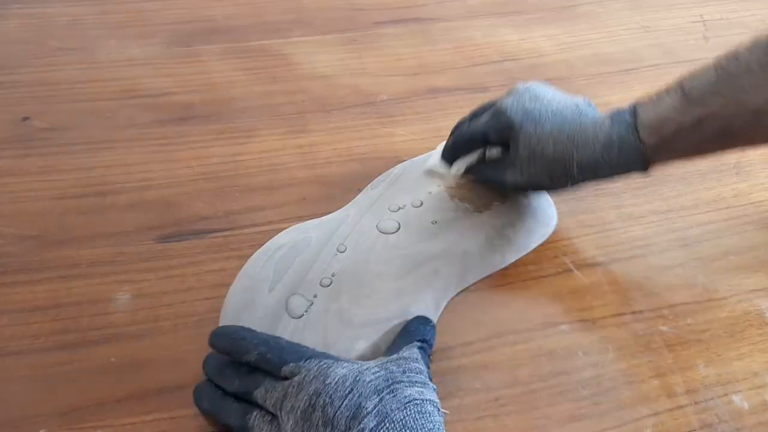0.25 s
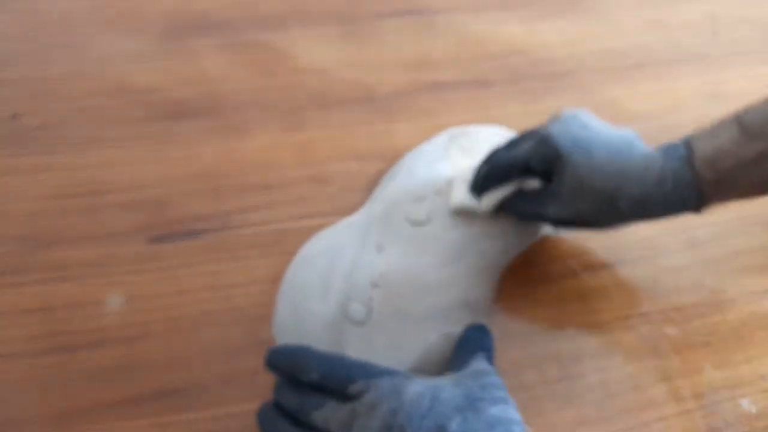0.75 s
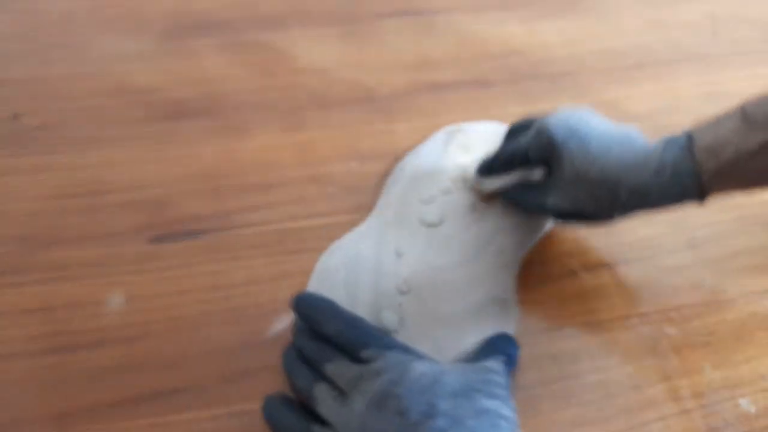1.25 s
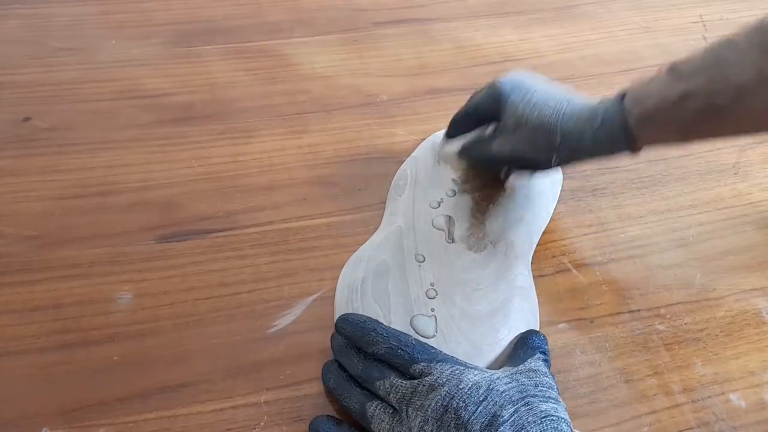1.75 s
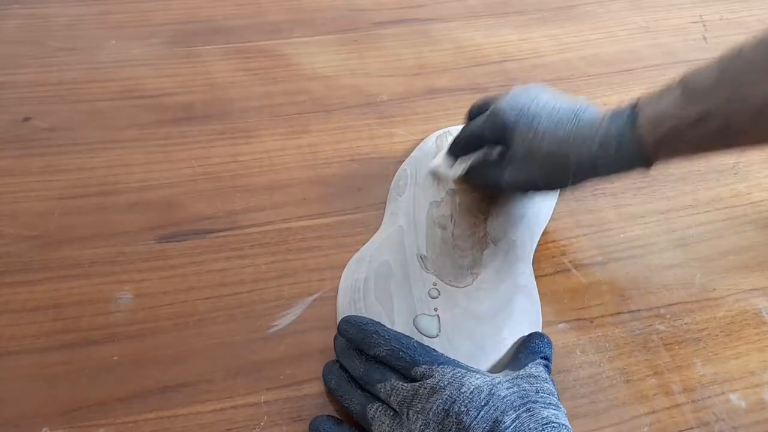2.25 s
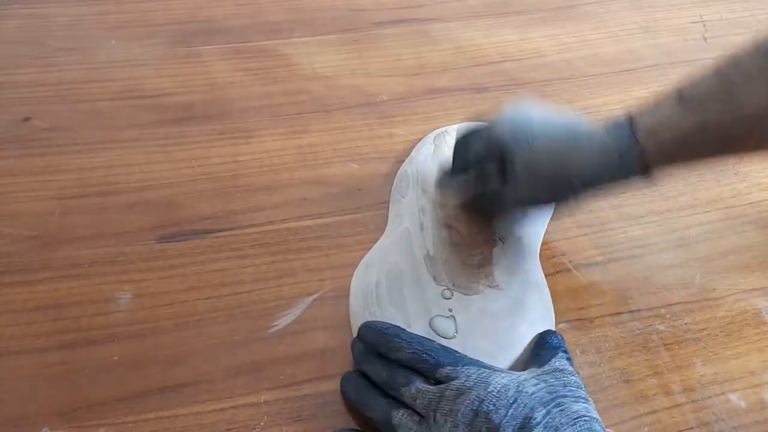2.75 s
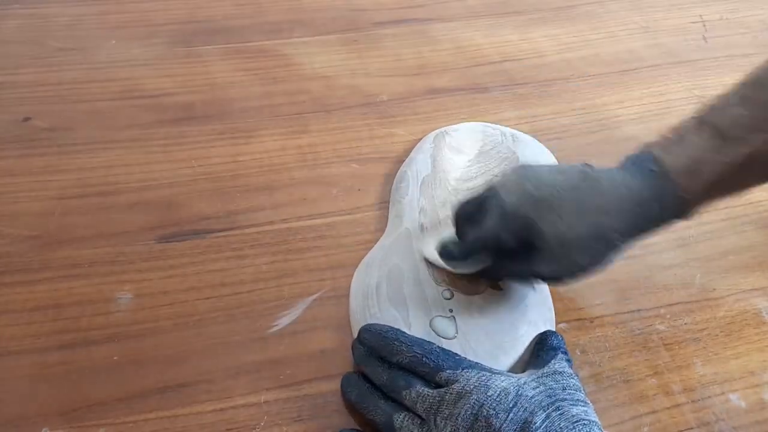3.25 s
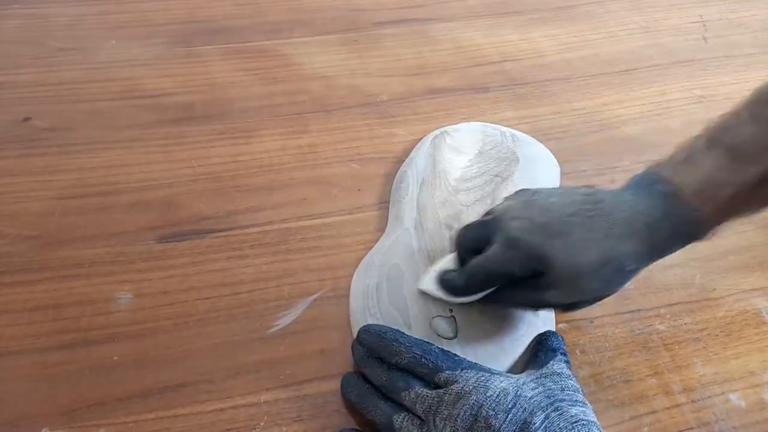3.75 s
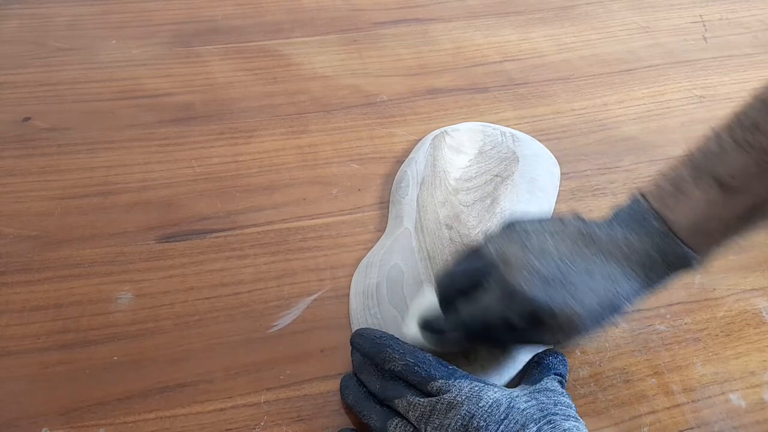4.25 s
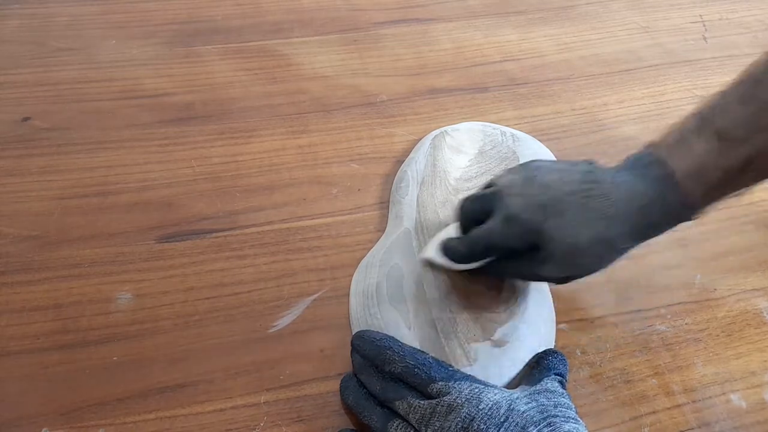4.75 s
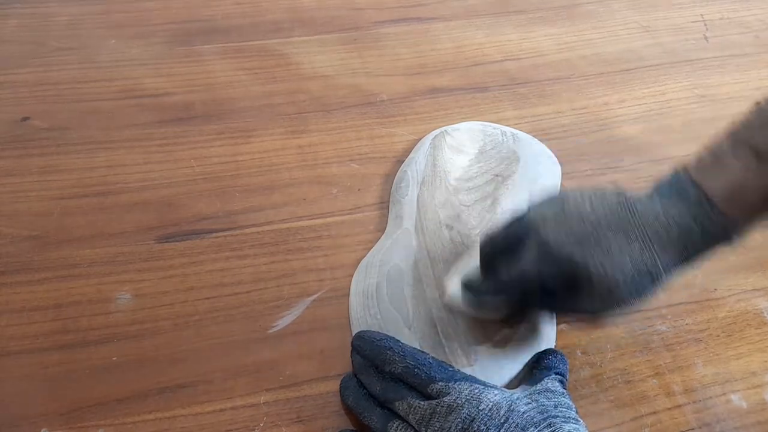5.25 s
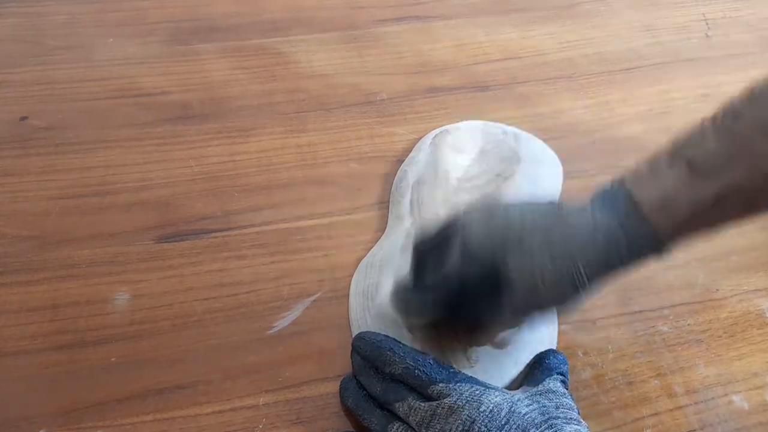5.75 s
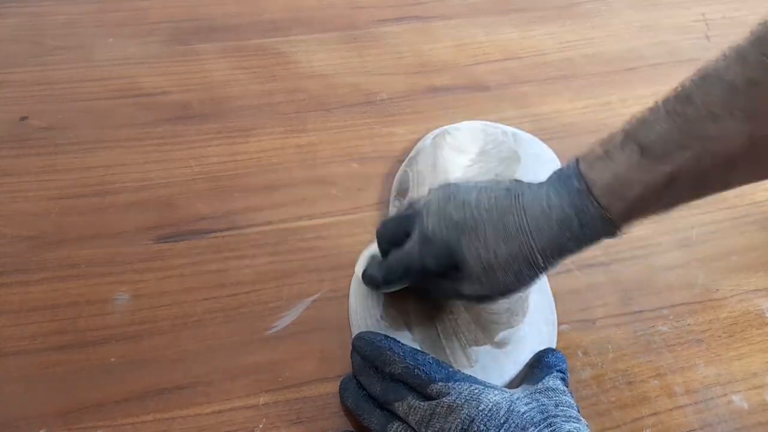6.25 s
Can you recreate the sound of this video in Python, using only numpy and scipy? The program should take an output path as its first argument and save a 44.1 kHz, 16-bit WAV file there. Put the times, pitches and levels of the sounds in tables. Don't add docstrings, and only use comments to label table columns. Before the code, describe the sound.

Quiet, dry cloth strokes on a wooden block, with occasional drags and tiny taps against a table, under a steady deep rumble of distant traffic.

```python
import sys
import numpy as np
from scipy import signal
from scipy.fft import rfft, irfft, next_fast_len
from scipy.io import wavfile
from scipy.ndimage import uniform_filter1d, map_coordinates

SR = 44100
rng = np.random.default_rng(int(sys.argv[2]) if len(sys.argv) > 2 else 0)


def store_pcm(level_fs):
    pcm = np.round(np.clip(level_fs, -1, 1) * 32767).astype(np.int16)
    wavfile.write(sys.argv[1], SR, np.atleast_2d(pcm).T)


def field_ratio(decibels):
    return 10 ** (np.asarray(decibels, dtype=float) / 20)


N = 287091
TIME = np.arange(N) / SR
STEPS = TIME[::16]

# start in seconds, length in seconds, level in dB, share (0-1) where it is fastest.
STROKES = [(0.018, 0.27, -71, 0.44), (0.225, 0.25, -72.5, .7), (0.432, 0.57, -67.5, 0.04),
           (0.84, 0.23, -67.5, 0.6), (0.913, 0.1, -63.5, 0.3), (1.067, 0.56, -66.5, 0.11),
           (1.195, 0.24, -61.5, 0.7), (1.735, .24, -70, 0.48), (2.087, 0.16, -72.5, 0.2),
           (2.275, 0.2, -67, 0.52), (2.45, 0.28, -68, .6), (2.637, 0.28, -65, 0.72),
           (2.878, 0.24, -66.5, 0.58), (3.108, 0.2, -61.5, 0.71), (3.299, 0.22, -63, 0.19),
           (3.5, 0.28, -62.5, 0.66), (3.753, 0.21, -68.5, 0.52), (3.951, 0.31, -65, 0.4),
           (4.238, 0.16, -70.5, .35), (4.44, 0.21, -71, 0.73), (4.584, 0.23, -70.5, 0.55),
           (4.76, 0.25, -67.5, 0.56), (4.93, 0.33, -68.5, 0.45), (5.143, 0.27, -65, 0.48),
           (5.342, 0.28, -63, 0.68), (5.6, 0.24, -62, 0.6), (5.816, .25, -62, 0.72),
           (6.07, .227, -57.5, 0.67), (6.299, 0.24, -60.5, 0.42)]
# time in seconds, scrub over hiss in dB.
DRYNESS = [(0, -3.5), (.5, 0), (.8, -4.5), (.96, -7.5), (1.15, -0.5), (1.9, -2.5), (2.6, -1.5), (3.0, -2),
           (3.25, -3.5), (3.65, -3.5), (4.2, -2.5), (4.3, -7.5), (4.55, -2), (4.67, -6.5), (5.15, -3.5),
           (5.3, -6), (5.9, -5), (6.5, -5.5)]
# frequency in Hz, level in dB per Hz.
FIBRES = [(6000, -120), (7600, -19), (8230, -9.5), (11100, -2.5), (11800, 0.6), (13000, -0.5), (15700, -3),
          (16100, -13.5)]
# frequency in Hz, level in dB per Hz.
WEAVE = [(4500, -120), (5600, -14), (6300, -4.5), (6700, -3.5), (7000, -4.8), (7400, -5.5), (8000, -16),
         (9500, -34), (12000, -120)]
# frequency in Hz, level in dB per Hz.
GRAIN = [(1200, -120), (2000, -8), (2900, -7), (4200, -6.5), (4800, -3), (5300, -3.5), (5800, -2.5),
         (6300, -17.5), (8000, -120)]
# frequency in Hz, width in Hz, level in dB.
HEM_MODE = [(7010, 260, 0)]
STROKE_ROUND, SLIDE_ROUND = 0.8, 0.51
GRAIN_FOLLOWS, GRAIN_DB = 1, 3

# start in seconds, length in seconds, rasp level in dB,
# low rings over the rasp in dB, high ring over the rasp in dB.
SLIDES = [(0.38, .17, -70.5, 5.5, -2), (0.5, 0.22, -71.5, 6, -4), (0.682, .15, -70, 1, -3),
          (0.9, .18, -72.5, -1, -0.5), (1.078, .07, -73, -1, -3), (1.168, 0.13, -62.5, -1.5, 2),
          (1.228, 0.22, -62, -7, 0.5), (1.293, .13, -61, -1, -6), (1.388, .13, -67.5, 0, -12),
          (1.76, 0.25, -75.5, 3, -8), (2.575, .11, -67, -5, -10), (2.635, 0.089, -63, -4.5, -14),
          (2.728, 0.19, -74, -4, -4), (3.18, 0.17, -73.5, -15, -8), (4.12, 0.072, -69.5, -10, -13),
          (6.134, .15, -73, -6, -13), (6.295, 0.17, -80, 0, -6)]
# frequency in Hz, width in Hz, level in dB.
BLOCK_MODES = [(1140, 72, -1), (1846, 26, 2), (2400, 240, -7), (2630, 150, -7.5), (3330, 42, -9),
               (3580, 50, -5.5), (3840, 60, -15)]
# frequency in Hz, width in Hz, level in dB.
RINGS = [(1540, 240, 0), (1690, 27, 0), (2580, 65, 0)]
# frequency in Hz, level in dB per Hz.
DRAG = [(150, -120), (210, 17), (500, 1), (1200, -9), (2000, -2.5), (4000, -9), (7000, -50), (8000, -120)]
# frequency in Hz, level in dB per Hz.
TABLE_TOP = [(150, -120), (190, -2), (450, -2), (1100, -12.5), (1600, -120)]
SLIDE_FASTEST, RING_SWING_DB = 0.57, 2.5
LIGHT_DB = -71
MIDDLE_RING_DB, MIDDLE_WAKES = -9, 0.78
GROAN_DB, GROAN_WAKES = -2.5, 0.52

# time in seconds, snap peak in dB, then body, knock and edge over the snap in dB.
TICKS = [(0.1013, -49, -0.5, -8, -10), (0.3317, -46, -27, -18, -22), (0.3909, -49, -2, -11, -3),
         (0.4244, -47, -3, -15, -8), (0.46, -53, 6, -14, 1), (0.8107, -53.5, -19, -1, 0),
         (0.845, -54, -18, -14, -14), (1.0484, -50.5, -16, -5, -10), (1.4819, -44.5, -13, -18, -6),
         (2.174, -42.5, -5, -13, -4), (2.5398, -43, -11, -20, 2), (2.5646, -50, 1, -6, 0.5),
         (2.5667, -52, 8, 7, -4), (4.0012, -59, -7, -6, -10), (4.1256, -38.5, -0.5, -4, -4)]
# frequency in Hz, time to fall 60 dB in seconds.
TAIL = [(800, 0.24), (3000, 0.31), (7000, 0.083), (12000, 0.077)]

# time in seconds, level in dB.
TRAFFIC = [(0, -57.5), (.5, -54), (1.05, -55), (1.41, -53), (1.55, -56), (1.98, -55), (2.14, -56),
           (2.8, -56.5), (3.2, -58), (3.43, -59.5), (3.72, -56.5), (3.86, -58), (4.0, -56), (4.15, -57.5),
           (4.9, -55), (5.25, -54.5), (6.0, -54), (6.51, -55.5)]
# centre in seconds, length in seconds, lift of the deep hum in dB, lift
# of the upper hum in dB.
SURGES = [(0, 0.13, 3.5, 7), (.13, .08, -2, -6), (.39, .08, -2, -3), (0.473, .06, 3.5, 11.5),
          (.6, 0.19, 4.5, 7), (.72, 0.13, -1, 4), (0.926, 0.18, 5.5, 1.5), (1.25, .3, -0.5, 0.5),
          (1.522, 0.085, -10, -3), (1.612, .15, 8, -3), (1.804, 0.18, -3, -9), (1.965, .12, 8, 0.5),
          (2.058, .06, -12, -1), (2.645, 0.21, -1, 3.5), (3.057, 0.17, 6, -2), (3.33, 0.11, 11.5, -3),
          (3.43, 0.14, -11, -6), (3.532, 0.12, 7.5, -2.5), (3.854, 0.13, -2, -1), (3.994, 0.18, 0.5, 4.5),
          (4.618, 0.088, 4.5, 2), (5.16, 0.15, 3.5, 7), (5.35, .1, -3, 4.5), (5.55, .12, 3, 3.5),
          (5.72, .12, 7, 2.5), (5.825, 0.093, -8, 6), (6.02, 0.15, 2, 0), (6.16, 0.22, -1.5, -5.5),
          (6.363, 0.28, 0.5, 5)]
# frequency in Hz, width in Hz, level in dB.
DEEP_MODES = [(30.2, 7.7, -19), (50.4, 9.2, -8), (60.75, 8.1, -2)]
# frequency in Hz, width in Hz, level in dB.
STEADY_MODE = [(104.7, 6.5, 0)]
# frequency in Hz, width in Hz, level in dB.
HUM_MODES = [(128.6, 23, -7.5), (142.3, 12.7, 2), (162.2, 15, -8), (171.5, 16, -11)]
# frequency in Hz, width in Hz, level over the drone in dB.
DRONE_MODES = [(232.4, 13.7, 8), (284, 5, 3), (322.5, 7.1, 6), (348, 14, 1.5), (513, 21, -0.5)]
# frequency in Hz, level in dB per Hz.
DRONE = [(20, -44), (80, -16), (200, -5), (330, -4.5), (520, -8), (700, -11), (1400, -18), (2300, -25),
         (3200, -39), (5000, -120)]
# frequency in Hz, level in dB per Hz.
TYRES = [(500, -36), (750, -8.5), (930, 1.5), (1050, -2), (1300, -8.5), (1450, -13), (2200, -14),
         (3000, -120)]
# frequency in Hz, left-right likeness (0-1).
FAR_ALIKE = [(40, 0.96), (62, 0.9), (130, 0.94), (290, 0.9), (640, 0.28), (1410, 0.011)]
DEEP_DB, UPPER_DB, TYRE_DB = 6.5, 2.5, -11.5
TYRES_FOLLOW = 0.22

# frequency in Hz, left minus right in dB.
FAR_PAN = [(50, -1.5), (130, -0.5), (290, -4), (640, -3), (1410, 0.5), (3100, -2.5), (6820, -4),
           (15000, -1)]
# frequency in Hz, lead in radians.
LEAD = [(520, -2.5), (1460, 0.5), (2670, 1.3), (6800, 1.5), (8000, 1.7), (11000, 2), (13200, 4.5),
        (15500, 12.5)]
# frequency in Hz, level in dB per Hz.
SELF_NOISE = [(1300, -18), (2200, -26), (3000, -13), (4000, -13), (5500, -8), (6900, -8.5), (8100, -18),
              (12000, -11.5), (15700, -11.5), (16100, -10)]
TOP_HZ = 15810


def cloth():
    start, length, db, fastest = np.transpose(STROKES)
    dry_db, = curves(DRYNESS)
    speed = together(db, moves(start, length, fastest, STROKE_ROUND))
    speed = speed * field_ratio(1.06 * wobble(30))
    hiss = field_ratio(3.0) * ports(shape(FIBRES), [(9000, 0.08)], grain_db=1.0)
    scrub = field_ratio(dry_db + 1.5) * ports(shape(WEAVE), [(6500, 0.57)], grain_db=1.5)
    rasp = field_ratio(GRAIN_FOLLOWS * dry_db + GRAIN_DB) * ports(shape(GRAIN), [(4000, 0.97)], grain_db=1.0)
    hem = field_ratio(-10.5 + 3.3 * wobble(5.14)) * ports(sharp(HEM_MODE, 1.6), [(7000, 0.3)])
    return patched(speed * (hiss + scrub + rasp + hem), depth_db=1.37, size=(8, 20))


def slides():
    start, length, db, low_db, high_db = np.transpose(SLIDES)
    speeds = moves(start, length, SLIDE_FASTEST, SLIDE_ROUND)
    heavier_db = db - LIGHT_DB

    wood = lambda hz: sharp(BLOCK_MODES, 1.2)(hz) + 0.7 * shape(DRAG)(hz)
    rasp = field_ratio(6.5) * ports(wood, [(500, 0.94), (3000, 0.3)], grain_db=2)
    sound = together(db, speeds) * patched(rasp, depth_db=3.5, size=(2, 24))

    middle_db = low_db + MIDDLE_RING_DB + MIDDLE_WAKES * heavier_db
    for mode, ring_db in zip(RINGS, (low_db, middle_db, high_db)):
        swing = field_ratio(RING_SWING_DB * wobble(13.36))
        sound += together(db + ring_db, speeds) * swing * ports(sharp([mode], 1.23), [(2000, 1.0)])

    groan = ports(shape(TABLE_TOP), [(500, 0.8)], grain_db=2.5)
    sound += together(db + GROAN_DB + GROAN_WAKES * heavier_db, speeds) * groan
    return field_ratio(1.16 * wobble(40.02)) * sound


def ticks():
    out = np.zeros((2, N + SR))
    t = np.arange(400) / SR
    edges_hz = ((4600, 7500), (800, 2400), (2400, 4600), (8900, 15000))
    bands = [signal.butter(2, edges, "bandpass", fs=SR, output="sos") for edges in edges_hz]
    for s, db, *rel_db in TICKS:
        wake = 0.3 * rng.standard_normal(len(t)) * field_ratio(-60 * t / 0.003)
        blow = (t == 0) + wake
        parts = [signal.sosfilt(b, signal.sosfilt(b, blow)) for b in bands]
        tick = sum(field_ratio(db + d) * p / np.abs(p).max() for d, p in zip((0, *rel_db), parts))
        start = round((s - 0.0004) * SR)
        out[:, start:start + len(t)] += tick
    return out[:, :N]


def room(x):
    hz, t, z = signal.stft(rng.standard_normal((2, SR // 3)), SR, nperseg=256)
    tail = signal.istft(z * field_ratio(-60 * t / along(TAIL, hz)[:, None]), SR, nperseg=256)[1]
    flutter = 3.0 * field_ratio(-60 * np.arange(tail.shape[1]) / SR / 0.0089)
    tail = tail / np.linalg.norm(tail[0]) * (1 + flutter)
    tail[:, 0] += 0.3
    delayed = np.pad(x, ((0, 0), (172, 0)))
    return signal.fftconvolve(delayed, tail, axes=1)[:, :N]


def rumble():
    drone_db, = curves(TRAFFIC)
    s, length, *surge_db = np.transpose(SURGES)
    swells = np.exp(-(2 * (STEPS - s[:, None]) / length[:, None]) ** 2)
    deep_db, upper_db = map(smooth, np.array(surge_db) @ swells)

    hum = field_ratio(drone_db + deep_db + DEEP_DB) * evened(ports(sharp(DEEP_MODES, 1.65), FAR_ALIKE))
    hum += field_ratio(drone_db + upper_db + UPPER_DB) * evened(ports(sharp(HUM_MODES, 1.455), FAR_ALIKE))
    hum += field_ratio(drone_db + 1.15) * ports(sharp(STEADY_MODE, 1.11), FAR_ALIKE)

    broad = lambda hz: shape(DRONE)(hz) * (1 + 0.43 * sharp(DRONE_MODES, 1.6)(hz))
    drone = field_ratio(drone_db + 1.32) * ports(broad, FAR_ALIKE)

    mean_db = drone_db.mean()
    tyre_db = mean_db + TYRE_DB + TYRES_FOLLOW * (drone_db - mean_db) + 0.92 * wobble(4.07)
    return hum + drone + field_ratio(tyre_db) * ports(shape(TYRES), FAR_ALIKE)


def moves(start, length, fastest, roundness):
    u = (STEPS - start[:, None]) / length[:, None]
    top = np.clip(np.reshape(fastest, (-1, 1)), 0.05, 0.95)
    ramp = np.clip(np.minimum(u / top, (1 - u) / (1 - top)), 0, 1)
    return np.sin(np.pi / 2 * ramp) ** roundness


def together(db, speeds):
    return smooth(np.sqrt(field_ratio(db) ** 2 @ speeds ** 2))


def ports(response, alike, grain_db=0):
    m = next_fast_len(N)
    hz = np.fft.rfftfreq(m, 1 / SR)
    scratch = field_ratio(grain_db * wobble(900)) if grain_db else 1
    pair = rfft(rng.standard_normal((2, N)) * scratch, m)
    turn = np.arccos(np.clip(along(alike, hz), -1, 1)) / 2
    mid, side = irfft(pair * response(hz) * np.array([np.cos(turn), np.sin(turn)]), m)[:, :N]
    return unit(np.array([mid + side, mid - side]))


def patched(x, depth_db, size):
    z = signal.stft(x, nperseg=512)[2]
    field = uniform_filter1d(rng.standard_normal(z.shape[1:]), size=size[0], axis=0)
    field = uniform_filter1d(field, size=size[1], axis=1)
    return signal.istft(z * field_ratio(depth_db * unit(field)), nperseg=512)[1][:, :N]


def evened(x):
    power = np.abs(uniform_filter1d(np.mean(x ** 2, axis=0), size=6000)) + 0.05
    return unit(x / power ** 0.35)


def resonances(modes):
    def response(f):
        return sum((-1) ** k * field_ratio(db) * 1j * f * w / (c * c - f * f + 1j * f * w)
                   for k, (c, w, db) in enumerate(modes))
    return response


def sharp(modes, power):
    return lambda hz: sum(np.abs(resonances([m])(hz)) ** power for m in modes)


def shape(points):
    return lambda hz: field_ratio(along(points, hz))


def along(points, hz):
    f, v = np.transpose(points)
    return np.interp(np.log(hz + 1), np.log(f + 1), v)


def filtered(x, response):
    m = next_fast_len(N + SR // 2)
    return irfft(rfft(x, m) * response(np.fft.rfftfreq(m, 1 / SR)), m)[..., :N]


def curves(rows):
    s, *cols = np.transpose(rows)
    return [np.interp(TIME, s, c) for c in cols]


def wobble(rate):
    knots = rng.standard_normal(int(N * rate / SR) + 4)
    return smooth(map_coordinates(knots, [STEPS * rate]))


def smooth(x):
    return np.interp(TIME, STEPS, x)


def unit(x):
    return x / np.sqrt(np.mean(x ** 2) + 1e-20)


def scene():
    side = np.array([[1], [-1]])
    rubbing = filtered(cloth() + slides(), lambda hz: np.exp(0.5j * side * along(LEAD, hz)))
    taps = ticks()
    near = rubbing + taps + field_ratio(-4) * room(taps)
    return filtered(near + rumble(), lambda hz: field_ratio(side * along(FAR_PAN, hz) / 2))


def band_limit(x):
    return signal.sosfilt(signal.butter(12, 15960, fs=SR, output="sos"), x)


def record(dry):
    hiss = field_ratio(-69.5) * ports(shape(SELF_NOISE), [(5000, 0.09)])
    heard = filtered(dry + hiss, lambda hz: hz < TOP_HZ)
    return band_limit(heard)


dry = scene()
out = record(dry)
store_pcm(out)
```